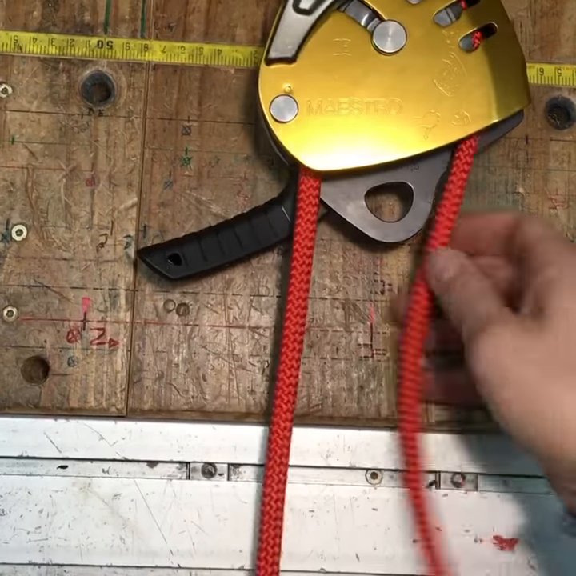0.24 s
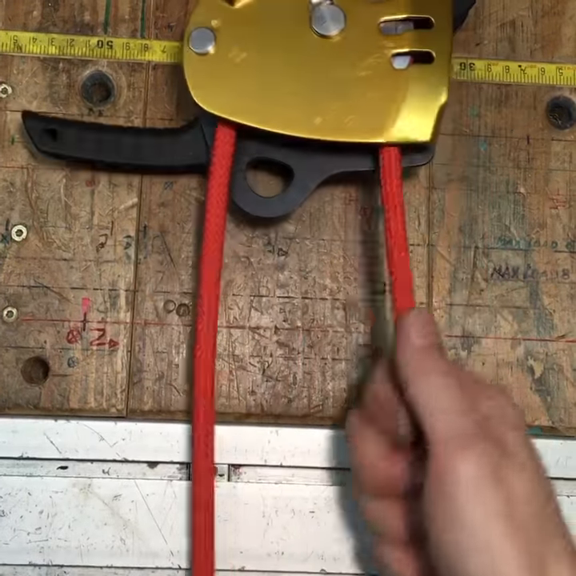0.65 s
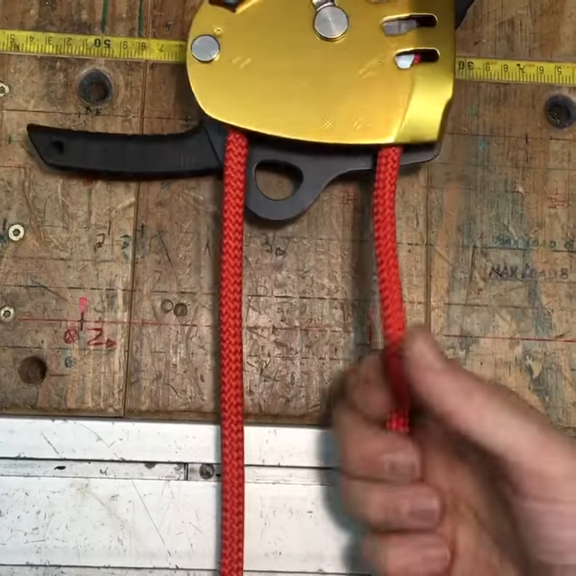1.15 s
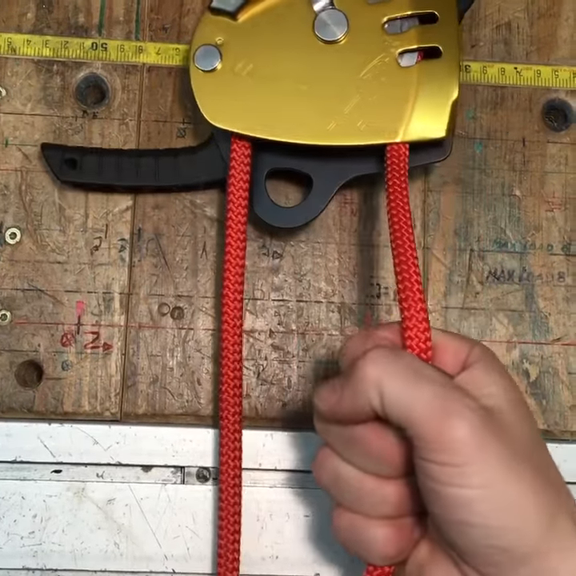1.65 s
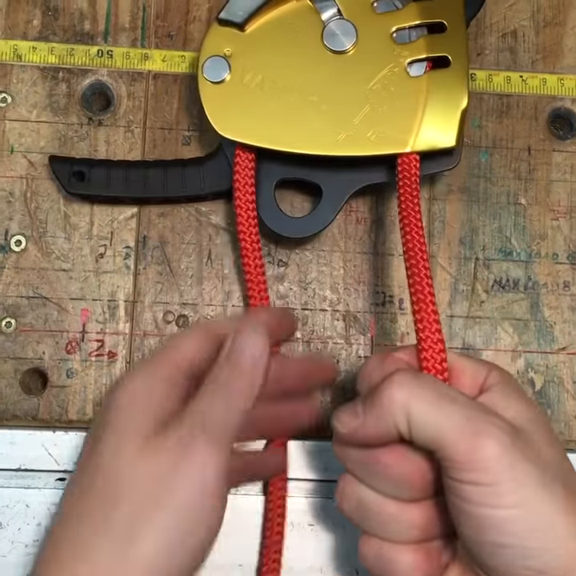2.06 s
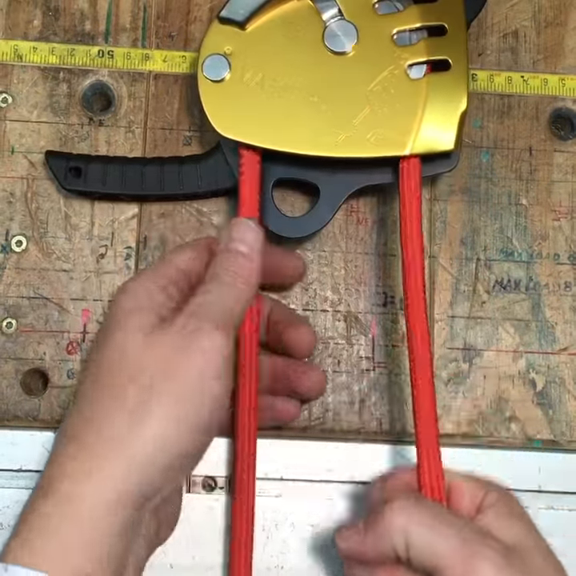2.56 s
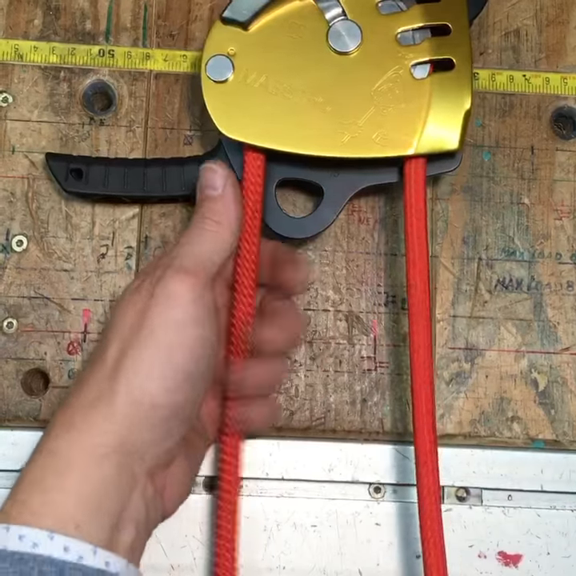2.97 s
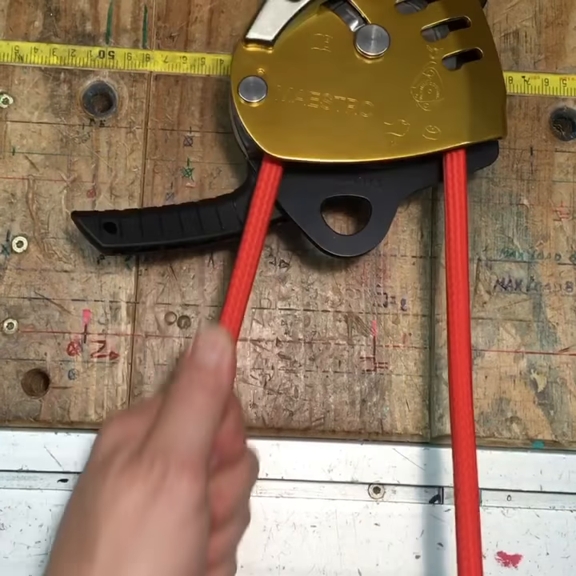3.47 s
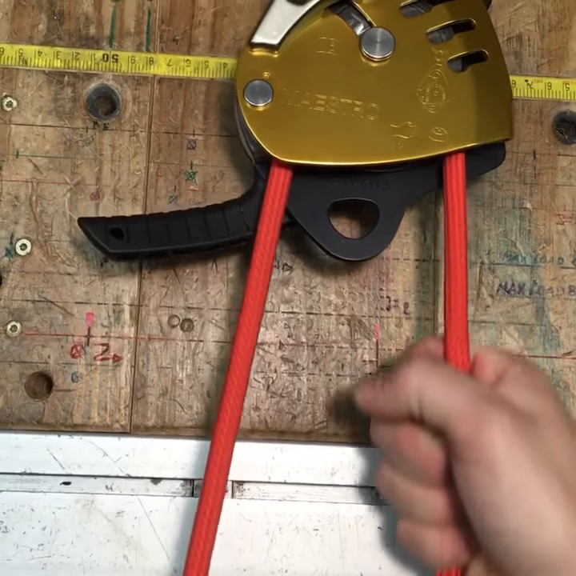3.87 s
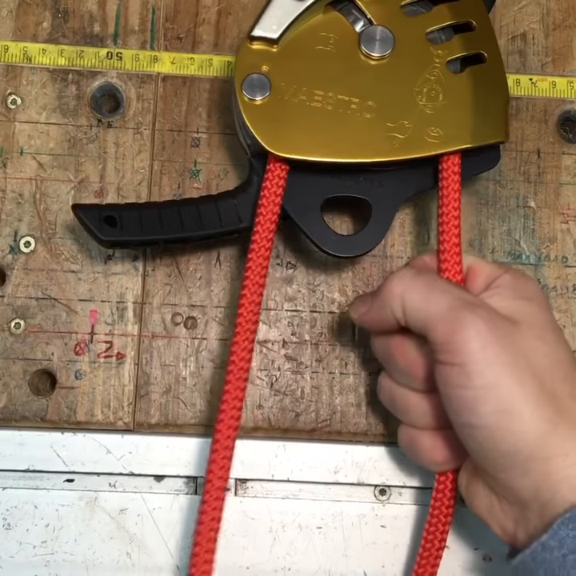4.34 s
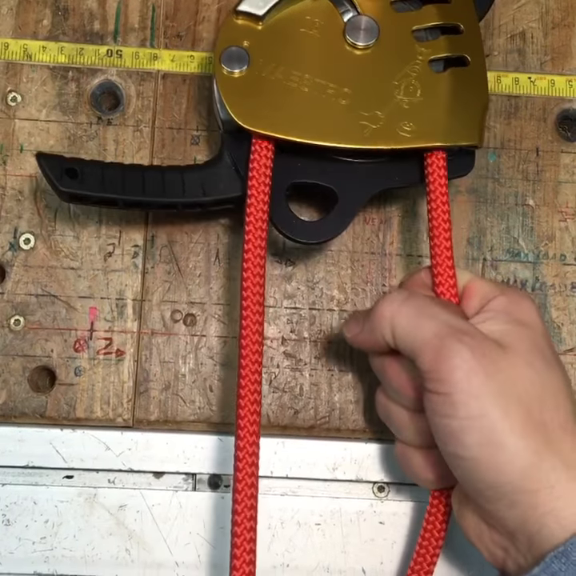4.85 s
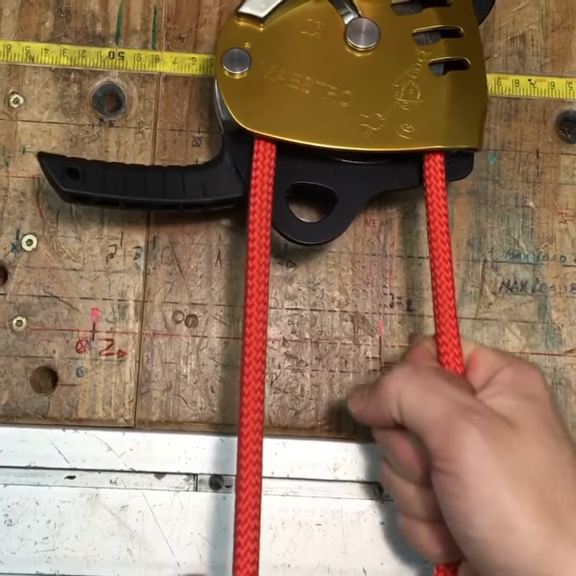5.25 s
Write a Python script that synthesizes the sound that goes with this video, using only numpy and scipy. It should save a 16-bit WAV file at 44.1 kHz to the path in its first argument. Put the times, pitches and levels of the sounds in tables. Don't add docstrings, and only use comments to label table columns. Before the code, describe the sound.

Close up in a quiet workshop, a metal rope pulley clacks against a bench, then a fast bright ratchet chatter runs and slows to a stop.

```python
import sys
import numpy as np
from scipy import signal
from scipy.fft import rfft, irfft, next_fast_len
from scipy.io import wavfile

SR = 44100
rng = np.random.default_rng(int(sys.argv[2]) if len(sys.argv) > 2 else 0)


def elevation(decibels):
    levels = np.asarray(decibels, float)
    return 10 ** (levels / 20)


def generate_wav(sig):
    pcm = np.round(np.clip(np.atleast_2d(sig).T, -1, 1) * 32767).astype(np.int16)
    wavfile.write(sys.argv[1], SR, pcm)


N = 242991


# [peak level/dB, seat rel/dB, wheel ring rel/dB, rattle/ms]
PAWL_DROPS = [
    (-15, 2, 2, 4.5),
    (-17, -1, 2, 1.8),
]
# [t/s, peak level/dB]
REBOUNDS = [
    (3.292, -30),
    (3.319, -36),
    (3.448, -35),
    (3.513, -20.5),
    (3.533, -41),
    (3.681, -22),
    (3.755, -18),
    (3.806, -38),
    (3.845, -40),
    (4.006, -24.5),
]
# [f/Hz, level/dB, t60/s]
PAWL_MODES = [(4600, -12, 0.013), (5650, -66, 0.016), (5880, -11, .012), (6600, -21, 0.0093),
              (7260, -4.5, 0.024), (7640, -4.5, .015), (8600, -3, 0.03), (9830, -12, 0.0097),
              (9760, 4, 0.021), (10700, -2, .006), (11520, -4, .005), (12100, -19.5, 0.0016),
              (12320, 3.5, .008), (13230, 4.5, .006), (13100, -6, .01), (13400, -12, .008),
              (14300, -11, .006), (14180, 8, .008), (15120, -20, .008)]
# [f/Hz, level/dB, t60/s]
WHEEL_MODES = [(1310, -21, 0.025), (1700, -28, 0.03), (1828, -17, 0.014), (2090, -24, 0.037),
               (2398, -17, .035), (3650, -23.5, 0.019), (3738, -10, 0.019), (3830, -17, 0.018)]


def ratchet():
    uneven_db, last_drop_db = 1.6, -2
    s = drops()
    peak_db, seat_db, ring_db, rattle_ms = np.array(PAWL_DROPS)[np.arange(len(s)) % 2].T
    peak_db = peak_db + uneven_db * rng.standard_normal(len(s)) + last_drop_db * (s == s[-1])
    late_s, late_db = np.transpose(REBOUNDS)

    seconds = np.r_[s, s - 0.0035, late_s]
    length_ms = np.r_[rattle_ms, s * 0 + 0.8, late_s * 0 + 1.1]
    force_db = np.r_[peak_db, peak_db - 19, late_db - 3] - 11
    bursts = contacts(length_ms, rise_ms=0.15, lead_db=-2.5, spread_db=4.0, shudder_ms=11)

    def wheel_db(hz):
        slap_db = seat_db if hz < 3000 else ring_db
        return force_db + np.r_[slap_db, s * 0, late_s * 0 - 4]

    pawl = strike(PAWL_MODES, seconds, bursts, lambda hz: force_db, shudder_db=-8.5, dull_db=0.5,
                  lag_cycles=0, cycles=59.0)
    wheel = strike(WHEEL_MODES, seconds, bursts, wheel_db, shudder_db=-1.5, dull_db=4.5,
                   lag_cycles=1.5, cycles=78.0)
    gap = signal.butter(1, [2750, 3250], "bandstop", fs=SR, output="sos")
    wheel = signal.sosfilt(gap, wheel)
    return high_pass(pawl, 4860, order=4) + high_pass(wheel, 690, order=4)


# [t/s, pawl drops per s]
HAUL_SPEED = [
    (3.1878, 19.12),
    (3.274, 45.47),
    (3.431, 52.71),
    (3.438, 46.83),
    (3.606, 50.09),
    (3.655, 43.75),
    (3.897, 28.65),
    (3.926, 32.94),
    (4.02, 21.76),
]


def drops():
    s, rate = np.transpose(HAUL_SPEED)
    t = np.arange(s[0], s[-1], 1 / SR)
    travel = np.cumsum(np.interp(t, s, rate)) / SR
    return np.interp(np.arange(int(travel[-1]) + 1), travel, t)


# [t/s, peak level/dB, bench rel/dB, belly rel/dB, brightness rel/dB]
KNOCKS = [(0.0014, -49.5, 7, 20.5, -5.5), (0.3087, -53, 16.5, -14.5, -17), (0.8075, -29.5, 7.5, -22, -24),
          (0.9039, -62, 8, 26.5, -4), (1.1169, -50, -11, 12, -11), (1.134, -46, 9.5, -18, -15),
          (1.1628, -43, 11, -17.5, -17), (1.3578, -34, 6, -6, -27), (1.8439, -57, 14.5, 19, -16.5),
          (2.1232, -59.5, 14.5, 22, -32), (2.912, -39, 11, -26, -20), (2.9757, -29, 4, -17.5, -12),
          (2.988, -44, 16, -5, -10), (4.1993, -63, -18, -16, 0.5), (4.3962, -51.5, 7.5, -6, -5),
          (4.5959, -55.5, -9.5, -5, -0.5), (4.6143, -50, -0.5, -11, -2), (4.659, -54, 5, -10, -2)]
CLACKS = [(0.3783, -19.5, -37, -27, 0), (0.3816, -18, -12, -25, -16), (0.3858, -18.5, -20, -9.5, -6.5),
          (.397, -36, -16, 0, -21), (1.2193, -56, -6, -33, -15.5), (1.2213, -16.5, -2.5, -7, 1),
          (2.9456, -30, 7, -7, -0.5), (2.952, -14.5, -2, -19, -10.5), (2.9590, -28.5, -1.5, 8, 1),
          (4.2565, -28.5, -8.5, -4, -1.5), (4.2600, -24.5, -24, 0, -10), (4.271, -40.5, 3, 20.5, -9)]
RUBS = [
    (0, -71, -17, 8, -7),
    (1.09, -57, 1, 18, -20),
    (1.145, -55.5, 20, 3, -12.5),
    (1.78, -58.5, 17, 5, -4),
    (2.893, -57, 7, -1, -16),
    (2.918, -30.5, 7.5, -5, -15),
    (4.22, -56, -4, -5, 7.5),
    (4.40, -54, -8, 25, -6),
    (4.432, -62.5, 13, 26.5, -14),
]
# [t/s, peak level/dB]
TICKS = [
    (.3452, -51.5),
    (0.3718, -51),
    (1.191, -45),
    (1.3185, -64),
    (1.6282, -66.5),
    (2.930, -48),
    (4.25, -56),
    (4.737, -74),
    (4.9754, -65.5),
]
# [t/s, peak level/dB, bench rel/dB, wheel ring rel/dB]
PINGS = [
    (0.774, -41.5, -2, -13),
    (0.808, -51, -18, -2.5),
    (1.36, -49, -20, -1),
    (1.9597, -57, 7, 15.5),
]
# [f/Hz, level/dB, t60/s]
HOUSING_MODES = [(339, -18, 0.067), (393, -9, 0.2), (475, -22, 0.087), (655, -5, 0.082), (689, -7, 0.099),
                 (833, -4, .015), (1095, -3.5, 0.056), (1184, -1, 0.043), (1260, 1, 0.03), (1802, 0, 0.029),
                 (1822, -8.5, 0.026), (1900, -27, 0.0072), (2550, 4.5, 0.0089), (2694, -17.5, 0.02),
                 (3564, -24.5, 0.004), (3800, -16, .015), (3660, 7, .015), (4487, -4, 0.002),
                 (5756, 4, 0.0062), (6270, 6.5, .008), (6200, -8.5, 0.023), (9720, 3, 0.0033),
                 (8800, 4.5, 0.0025), (12800, 10, 0.0012), (14000, 3.5, 0.0053)]
# [f/Hz, level/dB, t60/s]
BENCH_MODES = [(60, 5, 0.045), (86, -11, 0.45), (127.7, -7, 0.15), (191, -0.5, 0.11), (217.5, 6, 0.059),
               (245, -21, 0.12)]


def knocks():
    def with_crack(rows, crack_db):
        return [(*row, row[-1] + crack_db) for row in rows]

    # s, peak, bench, belly, plates, crack
    pings = [(s, db, bench_db, 2.5, -13, -24) for s, db, bench_db, _ in PINGS]
    ticks = [(s, db, 4, -12, -9.5, 7.5) for s, db in TICKS]
    sharp = with_crack(KNOCKS, 4) + with_crack(CLACKS, -3.5) + pings + ticks
    rubs = with_crack(RUBS, 0)
    s, peak_db, bench_db, belly_db, plates_db, crack_db = np.transpose(sharp + rubs)

    hard = contacts(np.full(len(sharp), 2.2), rise_ms=0.35, lead_db=-4, spread_db=1.5, shudder_ms=18)
    soft = contacts(np.full(len(rubs), 16.0), rise_ms=8.4, lead_db=-60, spread_db=0.5, shudder_ms=10)
    bursts = np.concatenate([hard, soft], axis=1)

    corners = np.log([420, 950, 2100, 3500, 6000])
    tones_db = np.array([belly_db, 0 * s, 0 * s, plates_db, crack_db]).T

    def plate_db(hz):
        return peak_db - 9.5 + np.array([np.interp(np.log(hz), corners, tone) for tone in tones_db])

    plates = strike(HOUSING_MODES, s, bursts, plate_db, shudder_db=-20, dull_db=3.0,
                    lag_cycles=1.5, cycles=45.0)
    bench = strike(BENCH_MODES, s + 0.003, bursts, lambda hz: peak_db + bench_db - 15, shudder_db=-14,
                   dull_db=0, lag_cycles=0.4, cycles=18.0)
    return high_pass(plates, 520, order=2) + high_pass(bench, 56, order=2)


def wheel_pings():
    s, peak_db, _, ring_db = np.transpose(PINGS)
    bursts = contacts(s * 0 + 1.2, rise_ms=0.21, lead_db=-3.5, spread_db=0.5, shudder_ms=7.4)
    return strike(WHEEL_MODES[-3:], s, bursts, lambda hz: peak_db + ring_db + 12, shudder_db=-16,
                  dull_db=0, lag_cycles=0, cycles=60.0)


# [t/s, slide through the hands level/dB, pressure on the sheave level/dB]
ROPE_MOVES = [(0.0, -62, -66), (0.3, -69.5, -71.5), (0.5, -64.5, -64), (0.7, -66, -66), (1.05, -71, -75),
              (1.22, -65.5, -65), (1.4, -76.5, -74.5), (1.65, -74, -79), (1.9, -60, -65),
              (2.05, -70.5, -72.5), (2.33, -66, -65), (2.8, -64.5, -68), (3.15, -73.5, -71),
              (4.06, -62, -68), (4.2, -70.5, -71), (4.35, -65.5, -72.5), (4.7, -74.5, -74),
              (5.51, -67, -65.5)]
# [t/s, level/dB]
FLICKS = [
    (.05, -62),
    (.16, -60),
    (.28, -64),
    (.86, -59.5),
    (2.942, -46.5),
]
# [t/s, peak level/dB, length/s]
SHOVES = [(0, -51, 0.045), (.34, -60.5, 0.06), (.62, -54.5, 0.098), (.88, -55, 0.077), (1.26, -37.5, 0.026),
          (1.38, -43.5, 0.049), (1.85, -69, 0.24), (2.35, -61, 0.33), (2.99, -43, 0.039),
          (3.08, -56.5, 0.11), (3.6, -57.5, 0.89), (4.36, -58, 0.15), (5.4, -62, .3)]
# [f/Hz, level/dB per Hz]
SHEATH_COLOUR = [(1760, -40.5), (3000, -27.5), (4500, -9.5), (4900, -15.5), (5920, 2), (10600, 5),
                 (12300, 4), (16000, 2.5)]
# [f/Hz, level/dB per Hz]
SCUFF_COLOUR = [(260, -32.5), (450, -6.5), (507, 0), (1000, -3.5), (1320, 3), (1500, -4), (2390, 0.5),
                (6000, -5.5), (7800, -41), (13200, -120)]
# [f/Hz, level/dB per Hz]
RUMBLE_COLOUR = [(21, -47), (35, 3), (70, 5.5), (114, -10.5), (163, -8), (227, -9), (324, -15),
                 (370, -14.5), (500, -31.5), (650, -51.5), (1100, -120)]


def rope():
    flick_s, rest_db = 0.013, -66.5
    slide_db, press_db = in_time(ROPE_MOVES)
    flicks = swells([(s, db, flick_s) for s, db in FLICKS])
    hiss = np.hypot(elevation(slide_db), flicks) * banded_noise(SHEATH_COLOUR, patchy_db=0.0)

    braid = banded_noise(SCUFF_COLOUR, patchy_db=1.52)
    sheave = sum(elevation(level_db) * ring(braid, hz, t60) for hz, level_db, t60 in WHEEL_MODES)
    scuff = elevation(press_db) * (braid + elevation(-12.5) * rms_one(sheave))

    weight = np.hypot(elevation(rest_db), swells(SHOVES))
    rumble = weight * banded_noise(RUMBLE_COLOUR, patchy_db=1.37)
    return hiss + scuff + rumble


# [start t/s, length/s, f/Hz, level/dB]
HELD_NOTES = [
    (1.5, 0.72, 157.5, -61.5),
    (2.25, 0.31, 164.2, -63),
    (2.66, 0.27, 147, -65),
]


def hum():
    rise_s, fall_s, tighten_hz_per_s = 0.053, 0.07, 6.6
    t, out = np.arange(N) / SR, 0
    waver = elevation(1.9 * drift(14.0))
    for start, length, pitch_hz, db in HELD_NOTES:
        since = t - start
        held = np.clip(since / rise_s, 0, 1) * np.clip((start + length - t) / fall_s, 0, 1)
        phase = 2 * np.pi * (pitch_hz + tighten_hz_per_s * since / 2) * since
        out = out + held * elevation(db) * np.sin(phase)
    return np.sqrt(2) * waver * out


# [f/Hz, level/dB, t60/s]
SEAT_MODES = [(201.3, -59, 0.066), (399, -65.5, 0.052), (623, -68.5, 0.15), (722, -67, 0.019),
              (966, -66, 0.0072), (1278, -59.5, 0.096)]


def haul():
    teeth = np.bincount((drops() * SR).astype(int), minlength=N)
    running = np.clip(signal.fftconvolve(teeth, np.hanning(SR // 12))[:N] / 2, 0, 1)
    shake, seat = rng.standard_normal(N), 0
    for hz, level_db, t60 in SEAT_MODES:
        mode = ring(ring(shake, hz, t60), hz, t60)
        seat = seat + elevation(level_db) * rms_one(mode)
    return running * seat


# [start t/s, end t/s, first level/dB, last level/dB]
DRAG_STROKES = [
    (0, 0.364, -70, -68),
    (1.091, 1.2, -66.5, -73),
    (1.848, 1.89, -58, -88),
    (2.986, 3.104, -65, -77),
    (4.384, 4.47, -64.5, -68.5),
    (4.513, 4.67, -74, -79),
]
# [f/Hz, level/dB per Hz]
WOOD_COLOUR = [(300, -14), (420, 1.5), (750, 1), (1200, 2), (1500, -7), (1800, -25.5)]


def drag():
    rows = []
    for start, end, first_db, last_db in DRAG_STROKES:
        rows += [(start - 0.03, -95), (start, first_db), (end, last_db), (end + 0.03, -95)]
    return elevation(in_time(rows)[0] + 5) * banded_noise(WOOD_COLOUR, patchy_db=4.0)


def workshop(x):
    t60_s, wall_cut_hz = 0.2, 9300
    size = next_fast_len(N + SR)
    turn = -2j * np.pi * np.arange(size // 2 + 1) / size
    dull = np.exp(-2 * np.pi * wall_cut_hz / SR)
    soft, walls = (1 - dull) / (1 - dull * np.exp(turn)), 0
    lags = (rng.uniform(0.013, 0.03, size=10) * SR).astype(int)
    for k, lag in enumerate(lags):
        loop = elevation(-60 * lag / SR / t60_s) * soft * np.exp(turn * lag)
        walls = walls + (-1) ** k * loop / (1 - loop)
    return irfft(rfft(x, size) * walls, size)[:N]


# [f/Hz, level/dB per Hz]
AIR_COLOUR = [(15, -36), (25, -7), (49, -3.5), (202, -6.5), (553, -26), (726, -27.5), (3060, -35),
              (3700, -19), (4600, -36), (15200, -25), (16500, -43)]


def still_air():
    return elevation(-65.5 - 6.5) * banded_noise(AIR_COLOUR, patchy_db=0.6)


def contacts(length_ms, rise_ms, lead_db, spread_db, shudder_ms):
    ms = np.arange(4000) * 1000 / SR
    draw = rng.random((len(length_ms), 2, len(ms)))
    sizes = elevation(-spread_db * np.log(np.maximum(draw[:, 0], 0.015))) * np.sign(draw[:, 1] - 0.5)
    sizes = sizes * (1 - np.exp(-(ms + 0.03) / rise_ms))
    blow = sizes * np.exp(-ms / np.clip(length_ms, 0.3, 25)[:, None])
    energy = np.sqrt(np.sum(blow ** 2, axis=1, keepdims=True))
    click = elevation(lead_db) * (np.arange(len(ms)) == 8)
    shudder = sizes * np.exp(-ms / shudder_ms) / energy
    return np.array([blow / energy + click, shudder])


def strike(modes, seconds, bursts, colour_db, shudder_db, dull_db, lag_cycles, cycles):
    out, chance = np.zeros(N), rng.standard_normal((len(seconds), len(modes)))
    blow, shudder = bursts
    for (hz, level_db, t60), luck in zip(modes, chance.T):
        first = np.round((seconds + lag_cycles / hz) * SR).astype(int)
        at = first[:, None] + np.arange(blow.shape[1])
        force = blow + shudder * elevation(shudder_db - dull_db * np.log2(hz / 1000))
        force = force * elevation(colour_db(hz) + level_db + 2 * luck)[:, None]
        clicks = np.bincount(at.ravel(), force.ravel(), N)[:N]
        out += ring(clicks, hz, min(t60, cycles / hz))
    return out


def ring(clicks, hz, t60):
    r, w = elevation(-60 / (t60 * SR)), 2 * np.pi * hz / SR
    return signal.lfilter([0, np.sin(w)], [1, -2 * r * np.cos(w), r * r], clicks + 1e-18)


def banded_noise(spectrum, patchy_db):
    hz, level_db = np.transpose(spectrum)
    edges = np.geomspace(hz[0], hz[-1], int(3 * np.log2(hz[-1] / hz[0])) + 2)
    out, together, white = 0, drift(3.3), rng.standard_normal((2, N))
    for k, (low, high) in enumerate(zip(edges, edges[1:])):
        sos = signal.butter(2, [low, high], "band", fs=SR, output="sos")
        band = signal.sosfilt(sos, white[k % 2])
        colour_db = np.interp(np.log(low * high) / 2, np.log(hz), level_db)
        out = out + band * elevation(colour_db + patchy_db * (together + 0.77 * drift(19.0)))
    return rms_one(out)


def drift(rate_hz):
    r = np.exp(-2 * np.pi * rate_hz * 40 / SR)
    slow = signal.lfilter([1], [1, -2 * r, r * r], rng.standard_normal(N // 40 + 2002))[2000:]
    return np.interp(np.arange(N) / 40, np.arange(len(slow)), rms_one(slow))


def swells(rows):
    t = np.arange(N) / SR
    return np.sqrt(sum(elevation(db) ** 2 * np.exp(-((t - s) / length) ** 2) for s, db, length in rows))


def in_time(rows):
    s, *columns = np.transpose(rows)
    return [np.interp(np.arange(N) / SR, s, c) for c in columns]


def rms_one(x):
    return x / np.sqrt(np.mean(x ** 2) + 1e-20)


def high_pass(x, hz, order):
    return signal.sosfilt(signal.butter(order, hz, "high", fs=SR, output="sos"), x)


def scene():
    pulley = knocks() + ratchet() + wheel_pings()
    air = still_air()
    room = elevation(-22) * workshop(pulley)
    return (pulley + room + rope() + hum() + air + haul() + drag())[None]


def band_limit(x):
    return signal.sosfilt(signal.butter(12, 16650, fs=SR, output="sos"), x)


def record(dry):
    steep_cut = signal.cheby2(10, 50, 16500, fs=SR, output="sos")
    mix = signal.sosfilt(steep_cut, high_pass(dry, 36, order=2))
    return band_limit(mix)


dry = scene()
out = record(dry)
generate_wav(out)
```